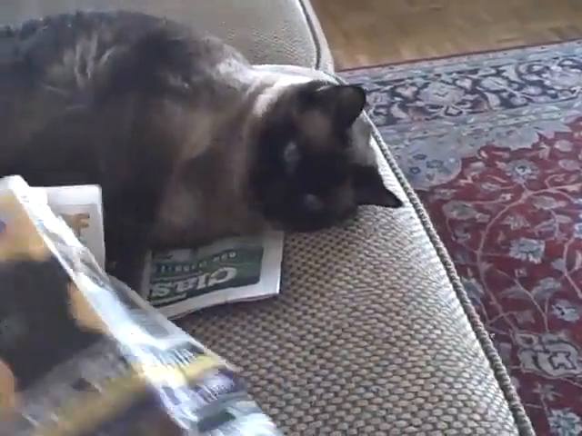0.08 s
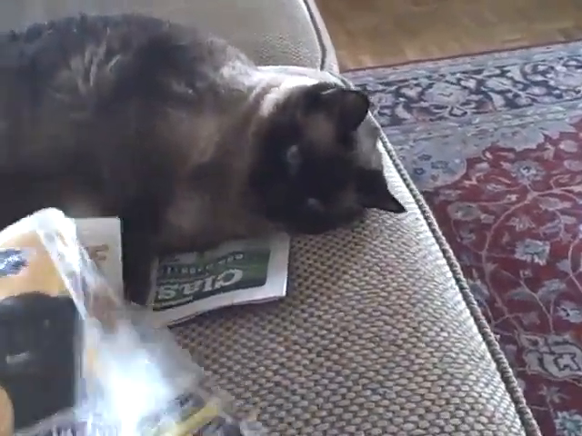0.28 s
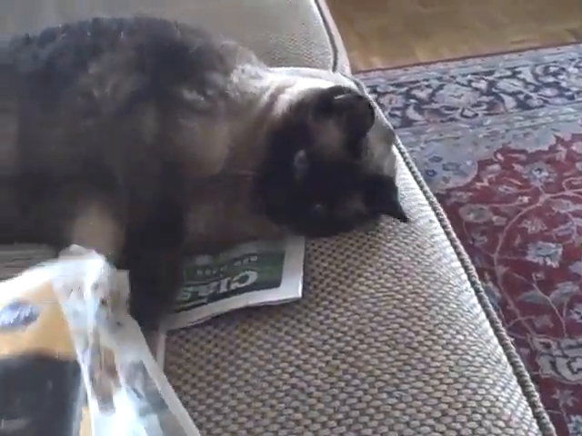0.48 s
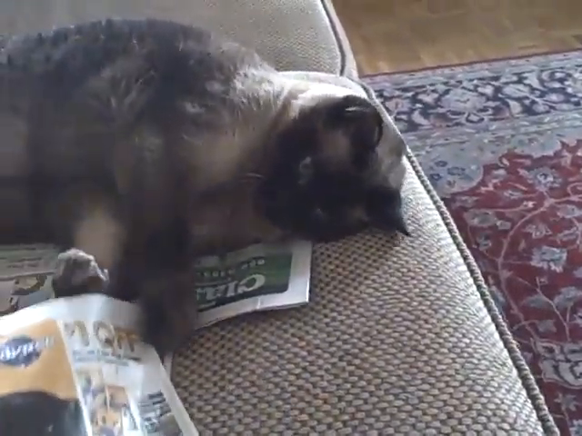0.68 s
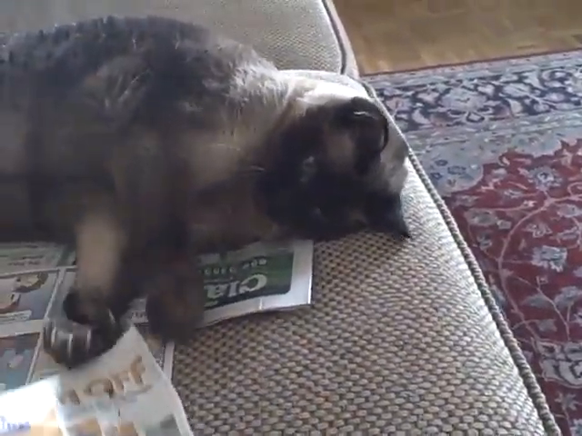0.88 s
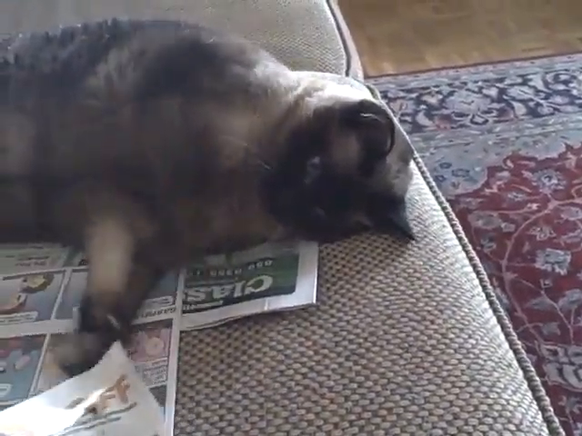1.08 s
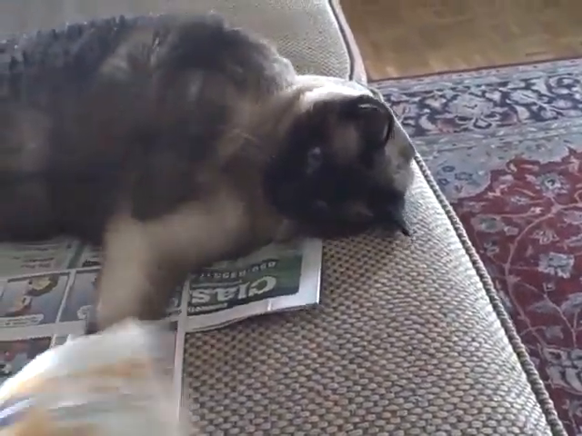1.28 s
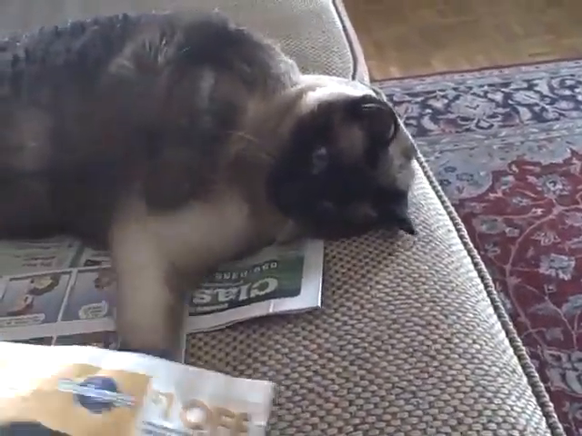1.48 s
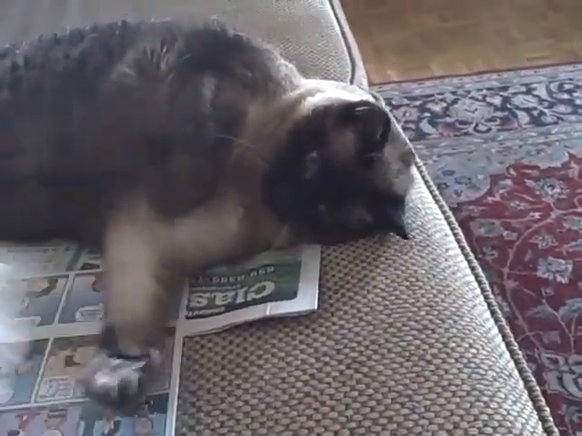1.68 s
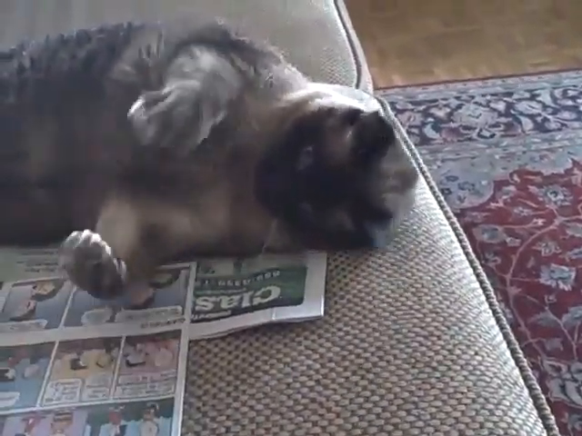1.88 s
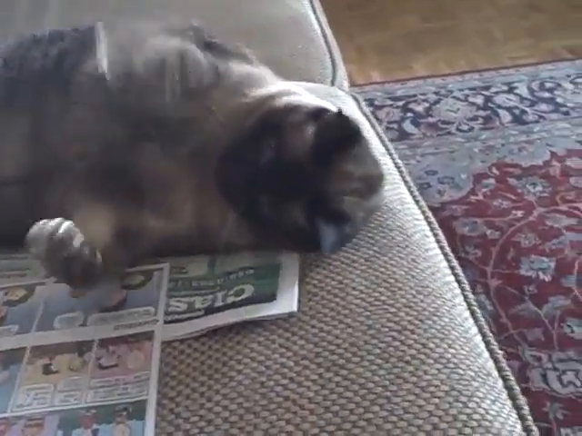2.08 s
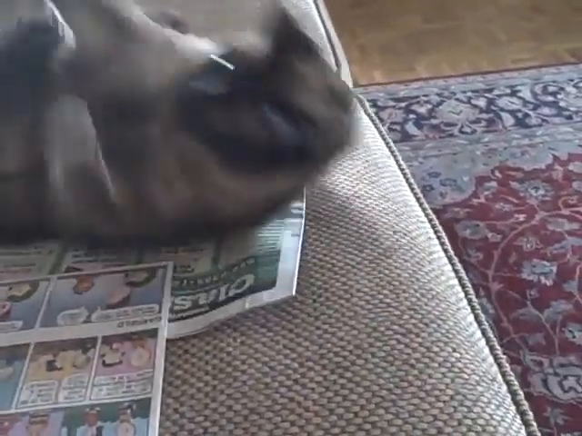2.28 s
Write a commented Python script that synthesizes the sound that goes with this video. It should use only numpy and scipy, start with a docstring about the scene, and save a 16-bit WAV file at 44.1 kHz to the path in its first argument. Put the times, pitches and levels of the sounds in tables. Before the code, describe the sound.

Crisp paper crackling, loudest early on, with soft paw thuds as a cat claws newspaper sheets

```python
"""Newspaper creases snap one by one as a cat on a couch paws and kicks at the sheets close by.
Snaps are decaying noise in three bands; crumples are bursts of dense ringing grains; pops are short rings.
Between them the paper slides with a grainy rustle and the cushion rumbles (both shaped noise).
Paws thud softly as low damped rings, above a faint steady hiss."""
import sys
import numpy as np
from scipy import signal
from scipy.fft import rfft, irfft
from scipy.io import wavfile

SR = 44100
rng = np.random.default_rng(int(sys.argv[2]) if len(sys.argv) > 2 else 0)


def to_wav(s):
    """Save 16-bit WAV."""
    ch = np.atleast_2d(s).T  # columns
    pcm = np.round(np.clip(ch, -1, 1) * 32767)  # PCM
    wavfile.write(sys.argv[1], SR, pcm.astype(np.int16))


N = 101430
T = np.arange(N) / SR

# sliding paper and cushion: (time [s], rustle level [dB], treble tilt [dB], rumble level [dB])
SLIDING = [(0, -53, 2, -64), (.15, -53.5, -5, -65), (.3, -54, -1.5, -59.5), (.5, -49, 11, -53),
           (.64, -54.5, 2.5, -59), (.72, -60.5, 6, -65.5), (.9, -55, -2.5, -59.5), (1.02, -61, 0.5, -65.5),
           (1.15, -62.5, 3, -66.5), (1.28, -57, 3, -58), (1.44, -53.5, 0, -61), (1.53, -56, 1, -56),
           (1.63, -53, 0.5, -61), (1.8, -54, -2, -59), (1.96, -56.5, -2.5, -67), (2.07, -63, -2.5, -67.5),
           (2.12, -71, -6, -66), (2.3, -65, 0.5, -66)]


def amp(db):
    """Convert dB to amplitude gain."""
    return 10 ** (np.asarray(db) / 20)


def rms_one(x):
    """Scale to rms 1."""
    return x / np.sqrt(np.mean(x ** 2) + 1e-20)


def band(x, low_hz, high_hz):
    """Causal Butterworth band-pass."""
    sos = signal.butter(2, [low_hz, high_hz], "band", fs=SR, output="sos")
    return signal.sosfilt(sos, x + 1e-18)


def lowpass(x, order, cutoff_hz):
    """Causal Butterworth low-pass."""
    return signal.sosfilt(signal.butter(order, cutoff_hz, fs=SR, output="sos"), x)


def coloured(x, spectrum):
    """Weight the spectrum, interpolating dB over log frequency; rms 1."""
    hz, db = np.transpose(spectrum)
    f = np.maximum(np.arange(N // 2 + 1) * SR / N, 1)
    gain = amp(np.interp(np.log(f), np.log(hz), db, left=-80))
    return rms_one(irfft(rfft(x) * gain, N))


def tilted(x, tilt_db):
    """Raise the treble by the tilt and lower the body by as much."""
    split_hz = 3620
    body = lowpass(x, 2, split_hz)
    return amp(-tilt_db) * body + amp(tilt_db) * (x - body)


def drift(rate_hz):
    """Slow random wander: noise through a double one-pole low-pass; rms 1."""
    r = np.exp(-2 * np.pi * rate_hz / SR)
    noise = rng.standard_normal(N + SR)
    return rms_one(signal.lfilter([1], [1, -2 * r, r * r], noise)[SR:])  # first second: settling


def ring(clicks, hz, cycles):
    """Two-pole resonator: each click rings as a sine losing 60 dB in the given cycles."""
    r = amp(-60 * hz / (cycles * SR))
    w = 2 * np.pi * hz / SR
    return signal.lfilter([0, np.sin(w)], [1, -2 * r * np.cos(w), r * r], clicks + 1e-18)


def grains(per_s, spread_db):
    """Random cracks of uneven size ring at 16 log-spaced pitches, balanced to even power per Hz."""
    grain_cycles = 3.13
    sizes = amp(spread_db * np.minimum(rng.exponential(1, N), 4)) * rng.choice([-1, 1], N)
    born = rng.random(N) < per_s / SR
    pitch_index = rng.integers(0, 16, N)
    out = np.zeros(N)
    for k, hz in enumerate(np.geomspace(400, 17000, 16)):
        clicks = sizes * born * (pitch_index == k)
        out += np.sqrt(hz) * rms_one(ring(clicks, hz, grain_cycles))
    return out


def snaps():
    """Each crease cracks and bursts into noise dying fastest in the treble; the sheet shivers on."""
    # creases: (time [s], mid-band level [dB], low band re mid [dB], high band re mid [dB], base decay [ms])
    creases = [(0.012, -38, -14, -11, 0.78), (0.0189, -23.5, -32, -0.5, 0.85), (0.05, -42, 3.0, -7, 1.6),
               (0.079, -30, -2.5, 1.5, 1.6), (0.092, -39.5, 1.5, -16, 3.6), (0.1067, -23.5, -18, -38, 0.82),
               (0.18, -39.5, 6.5, -12, 2.7), (0.2047, -23, -2, -13, 0.65), (0.2219, -33.5, 9, -8, 1.8),
               (0.2272, -28.5, 3, 9.5, 2.4), (0.242, -25.5, -6, -25, 6.2), (0.25, -22, -5.5, -17, 2.3),
               (0.2766, -29.5, -7, 12.5, 0.99), (0.3038, -44, 6.5, -18, 1.9), (0.338, -24, -14, -6, 2.7),
               (0.3631, -20.5, -10, -17, 0.8), (0.3814, -24.5, -1, 11, 5.5), (0.4025, -19, -7.5, 13, 7.3),
               (0.4449, -23, -10, -8, 1.2), (0.4556, -14, -18, -5, 1.8), (0.464, -8.5, -14, -10, 0.45),
               (0.466, -22, -1.5, -10, 1.7), (0.4699, -10, -26, -26, 4.7), (0.4801, -7, -9.5, 2, 0.39),
               (0.4927, -15.5, -8.5, -3, 1.1), (0.495, -22, -7, 9, 2.5), (0.5004, -26, 2, 7, 1.6),
               (0.505, -16.5, -7.5, -8, 3.7), (0.514, -17, -5.5, 0.5, 3.9), (0.5245, -19, -20, -10, 2.5),
               (0.533, -13, -39, 2, 3.4), (0.541, -28, -15, 9, 0.8), (0.5499, -20.5, -8.5, 6, 0.52),
               (0.5652, -27.5, -8, 1, 2.9), (0.5736, -27, -17, 5, 1.5), (0.589, -31, -24, 6, 1.5),
               (0.5942, -24, -11, -8, 3.6), (0.6037, -27, -6.5, 5, 1.6), (0.7512, -32.5, -9, -12, 0.61),
               (0.7748, -40, 0.5, 5, 1.9), (0.7838, -28, -8, -1, 1.04), (0.8073, -46, -22, 18, 0.63),
               (0.8243, -28.5, -17, -3, 1.5), (0.8407, -21.5, -42, -20, 2.05), (0.8486, -28, -10, 2, 5.6),
               (0.8759, -20, -0.5, 15, 0.92), (0.8797, -14, -15, -10, 2.1), (0.911, -25, -12, -11, 1.4),
               (0.913, -31, -18, -8, 3.4), (0.9652, -32.5, -14.5, 4, 5.1), (1.182, -40.5, 6, -20, 0.64),
               (1.1922, -40.5, 9.5, -17, 0.36), (1.1973, -39.5, 1, -20, 0.5), (1.314, -41, 4.5, -18, 1),
               (1.3248, -44, -2, 3, 2), (1.34, -30, -6.5, -6, 3.3), (1.348, -26.5, -5, 4, 0.7),
               (1.3678, -35, -2, -3, 3.2), (1.377, -33, -2, -1, 3.6), (1.391, -39.5, 2.5, 6, 4.3),
               (1.4708, -37.5, 6, 18, 1.9), (1.4931, -40, 0, 3.5, 3.7), (1.5463, -26.5, -15, -10, 6.5),
               (1.5638, -22.5, -12, 7, 0.59), (1.6604, -32, -5, -22, 1.05), (1.6866, -32.5, 0, -3, 0.49),
               (1.7028, -24.5, -21, 4, 2.4), (1.7269, -41.5, 16, -3.0, 0.43), (1.7432, -42, 3.5, -15, 3.3),
               (1.77, -20.5, -11.5, 3, 2.76), (1.7802, -28, 0, 7, 0.64), (1.829, -36.5, 11, -22, 0.39),
               (1.878, -35, 9, -20, 0.6), (1.8939, -17.5, 1, -4, 0.73), (1.9049, -23.5, -5, 0, 1.3),
               (1.909, -25.5, -10, 9.5, 1.6), (1.9624, -36, -10.5, -9, 3.3), (2.0606, -56, 0, 6.5, 7.5),
               (2.1116, -59.5, 2.5, -7, 2.4), (2.2216, -59, 6.5, -19.5, 2.6)]
    # bands: (low edge [Hz], high edge [Hz], decay factor [ratio], sheet shiver re burst [dB])
    bands = [(800, 2820, 1.0, -20), (1960, 6950, 0.61, -27), (5470, 15800, 0.44, -36)]
    rise_share, tick_strength = 0.18, 0.39  # rise re base decay; extra strength of the first crack
    shiver_decay_s, rolloff_hz = 0.014, 13870
    out = np.zeros(N)
    t = T[:SR // 10]
    for k, (low_hz, high_hz, decay_factor, shiver_db) in enumerate(bands):
        noise = rng.choice([-1., 1.], N)
        scale = 1 / np.std(band(noise, low_hz, high_hz))
        power = np.zeros(N + len(t))
        for s, db, low_db, high_db, decay_ms in creases:
            rise_s = rise_share * decay_ms / 1000
            burst = np.exp(-t / (decay_ms * decay_factor / 1000))
            shiver = amp(shiver_db) * np.exp(-t / shiver_decay_s)
            tick = 1 + tick_strength * np.exp(-t / rise_s / 2)
            shape = (1 - np.exp(-t / rise_s)) * (burst + shiver) * tick
            i = int(s * SR)
            power[i:i + len(t)] += (amp(db + (low_db, 0, high_db)[k]) * shape) ** 2
        out += scale * band(noise * np.sqrt(power[:N]), low_hz, high_hz)
    return lowpass(out, 1, rolloff_hz)


def crumples():
    """Crumpling sheets: dense uneven cracks under rise, hold and fall, each burst with its own tilt."""
    # bursts: (start [s], rise [s], hold [s], fall [s], level [dB], treble tilt [dB])
    bursts = [(0.074, 0.002, 0.018, 0.01, -43.5, -6), (0.128, 0.0028, 0.002, 0.0057, -40.5, -6.5),
              (0.171, 0.017, 0.028, .01, -40.5, -4), (0.216, 0.004, 0.014, 0.0068, -36.5, -6),
              (0.238, 0.0056, 0.0092, 0.021, -39, -6), (0.363, 0.0011, .015, .004, -28, -2.5),
              (.379, 0.0011, 0.016, 0.0074, -21.5, -2), (0.393, 0.0057, 0.012, .006, -18, 2.5),
              (0.413, 0.0038, 0.0093, 0.02, -28, -4), (0.442, 0.002, 0.04, .004, -33.5, 4.5),
              (0.459, 0.0031, 0.012, 0.011, -23, -2.5), (0.481, 0.018, 0.042, 0.02, -27, -2.5),
              (0.532, 0.004, 0.039, 0.035, -37, -6), (0.751, 0.022, 0.011, 0.0084, -56, 3),
              (0.846, 0.0029, 0.0043, 0.0027, -36.5, 0.5), (0.873, 0.0022, 0.0048, 0.0044, -24, -3),
              (0.878, .003, 0.017, 0.081, -46.5, 1), (1.327, 0.0013, 0.012, .01, -40.5, -5),
              (1.344, 0.0034, 0.029, 0.021, -37.5, -3), (1.4, 0.004, 0.01, 0.0094, -41.5, -4),
              (1.541, 0.0046, 0.0022, 0.0049, -40, 0.5), (1.735, 0.0046, 0.013, 0.013, -50.5, -1),
              (1.688, 0.0045, 0.02, 0.015, -42.5, -4.5), (1.764, 0.0026, 0.0094, 0.032, -50.5, -11),
              (1.898, 0.0049, 0.038, 0.096, -49.5, -5)]
    # crack spectrum: (frequency [Hz], relative level per Hz [dB])
    crack_colour = [(180, -12), (300, -10.5), (423, -19), (637, -20), (995, -13.5), (2600, -4.5),
                    (6440, -1.5), (16000, -15), (17100, -17), (18000, -39.5)]
    fall_loss_db = 14.5  # loss over one fall time
    swell_db, swell_rate_hz = 1.2, 200
    tilt_wander_db, tilt_wander_hz = 1.8, 140
    cracks = coloured(grains(per_s=9000, spread_db=2.0), crack_colour)
    cracks = rms_one(cracks * amp(swell_db * drift(swell_rate_hz)))
    power, weighted_tilt = np.full(N, 1e-20), np.zeros(N)
    for s, rise_s, hold_s, fall_s, db, tilt_db in bursts:
        rise = np.clip((T - s) / rise_s, 0, 1)
        falling_s = np.maximum(T - s - rise_s - hold_s, 0)
        burst_power = (rise * amp(db - fall_loss_db * falling_s / fall_s)) ** 2
        power += burst_power
        weighted_tilt += burst_power * tilt_db
    tilt = weighted_tilt / power + tilt_wander_db * drift(tilt_wander_hz)
    return np.sqrt(power) * tilted(cracks, tilt)


def pops():
    """Taut patches each ring at one pitch, low ones for fewer cycles, struck twice in quick succession."""
    # patches: (time [s], click level [dB], pitch [Hz])
    patches = [(0.1068, -25.5, 4210), (0.1143, -38, 2000), (0.1925, -30, 5200), (0.2048, -24, 2450),
               (0.2278, -22.5, 5400), (0.5325, -13.5, 5500), (1.1811, -35, 890), (1.1811, -36, 3680),
               (1.3483, -23, 4600), (1.3485, -30, 2200), (1.369, -30, 2040), (1.377, -25.5, 1950),
               (1.8938, -23, 1080), (1.9049, -23, 1540)]
    cycles_at_3khz = 19.0
    out = np.zeros(N)
    for s, db, hz in patches:
        click = np.zeros(N)
        strikes = int(s * SR) + np.array([0, rng.integers(20, 60)])  # samples
        click[strikes] = amp(db) * rng.choice([-1, 1], 2)
        out += ring(click, hz, cycles_at_3khz * (hz / 3000) ** 0.77)
    return out


def paper_slide():
    """Sliding paper: fine grains, noise and sparse ticks with wandering level and tilt."""
    # rustle spectrum: (frequency [Hz], relative level per Hz [dB])
    rustle_colour = [(180, -28), (300, -7), (350, -11.5), (797, 1.5), (868, -2.5), (1840, -1.5),
                     (14900, -6.5), (17100, -12.5), (18000, -36)]
    s, rustle_db, tilt_db, _ = np.transpose(SLIDING)
    fine = rms_one(grains(per_s=9000, spread_db=4.0))
    ticks = rms_one(grains(per_s=500, spread_db=2.8))
    rustle = coloured(fine + 0.24 * rng.standard_normal(N) + 0.08 * ticks, rustle_colour)
    level = amp(np.interp(T, s, rustle_db) + 0.24 * drift(40))
    return level * tilted(rustle, np.interp(T, s, tilt_db) + 1.4 * drift(6.5))


def thuds():
    """Paw blows on the cushion: each click drives a short damped ring, softened by a low-pass."""
    # blows: (time [s], click level [dB], pitch [Hz])
    blows = [(0.221, -50, 70), (0.389, -36, 92), (0.466, -32, 228), (0.504, -32, 152), (0.599, -43, 70),
             (0.878, -41, 90), (1.06, -50, 70.5), (1.208, -42.5, 129), (1.293, -53, 69), (1.369, -41, 174),
             (1.483, -31, 77), (1.4839, -26, 247), (1.508, -40, 42), (1.543, -35.5, 34.7),
             (1.701, -40, 164), (1.831, -40, 194), (1.878, -37, 333), (1.18, -49, 402), (1.99, -45.5, 49.8),
             (2.165, -46, 90)]
    ring_cycles, cutoff_per_pitch = 4.9, 1.4
    out = np.zeros(N)
    for s, db, hz in blows:
        click = np.zeros(N)
        click[int(s * SR)] = amp(db)
        out += lowpass(ring(click, hz, ring_cycles), 1, cutoff_per_pitch * hz)
    return signal.sosfilt(signal.butter(2, 40, "high", fs=SR, output="sos"), out)


def cushion_rumble():
    """Cushion under the moving cat: low coloured noise with wandering level."""
    # rumble spectrum: (frequency [Hz], relative level per Hz [dB])
    rumble_colour = [(12, -30), (20, -1.5), (109, -4.5), (189, -7), (245, -6.5), (439, -11.5), (600, -18),
                     (780, -42), (1320, -120)]
    s, _, _, rumble_db = np.transpose(SLIDING)
    noise = coloured(rng.standard_normal(N), rumble_colour)
    return amp(np.interp(T, s, rumble_db) + 2.0 * drift(4.7)) * noise


def scene():
    """Sum all layers into one channel."""
    return (snaps() + crumples() + pops() + paper_slide() + thuds() + cushion_rumble())[None]


def record(dry):
    """Add white hiss, round the peaks, then low-pass in two steps, the second steeper."""
    hiss_db, ceiling = -70.5, 0.9
    shelf_hz, cut_hz = 17200, 19400
    x = dry + amp(hiss_db) * rng.standard_normal(dry.shape)
    x = ceiling * np.tanh(x / ceiling)
    x = signal.sosfilt(signal.ellip(4, .5, 22, shelf_hz, fs=SR, output="sos"), x)
    return signal.sosfilt(signal.ellip(10, .5, 50, cut_hz, fs=SR, output="sos"), x)


dry = scene()
out = record(dry)
to_wav(out)
```